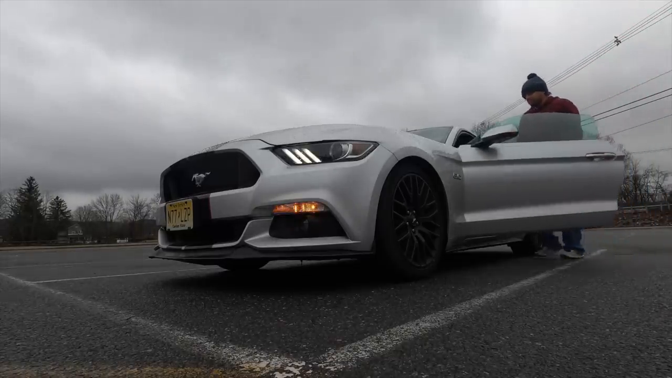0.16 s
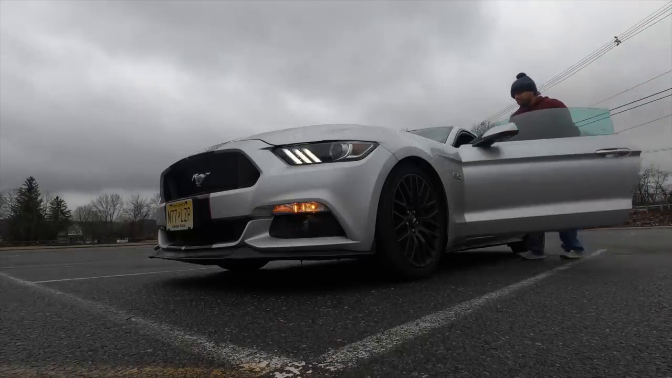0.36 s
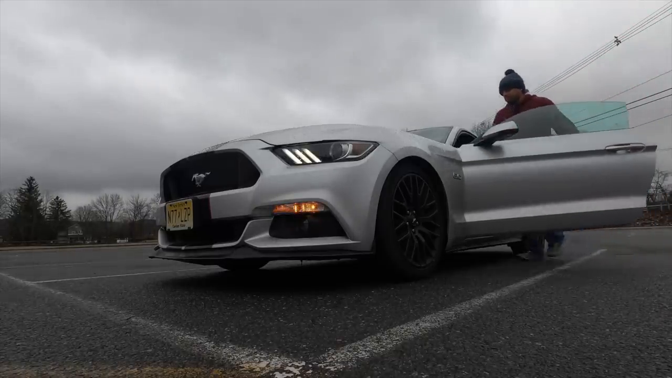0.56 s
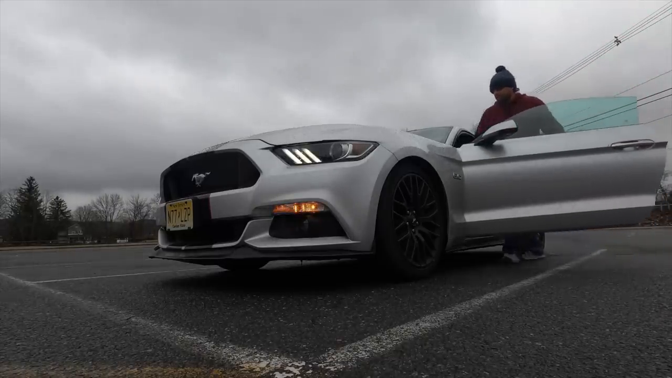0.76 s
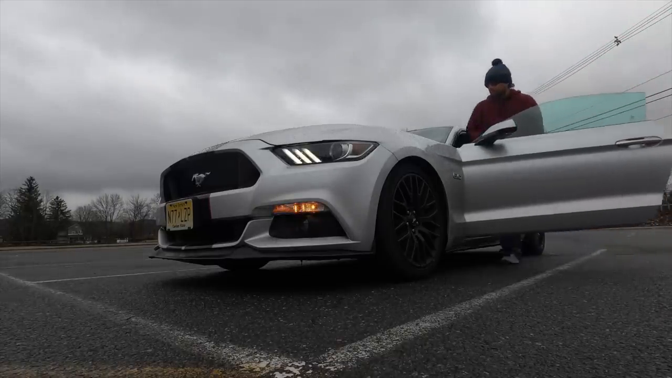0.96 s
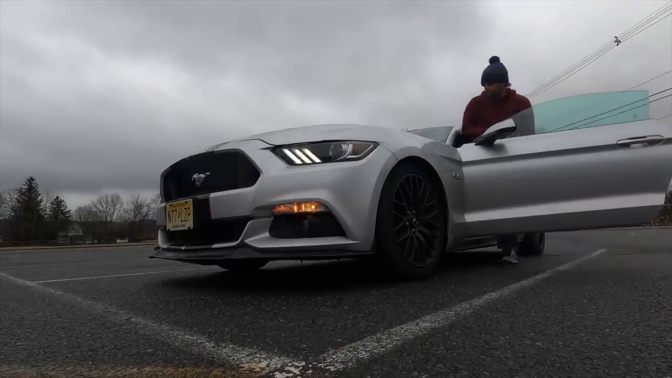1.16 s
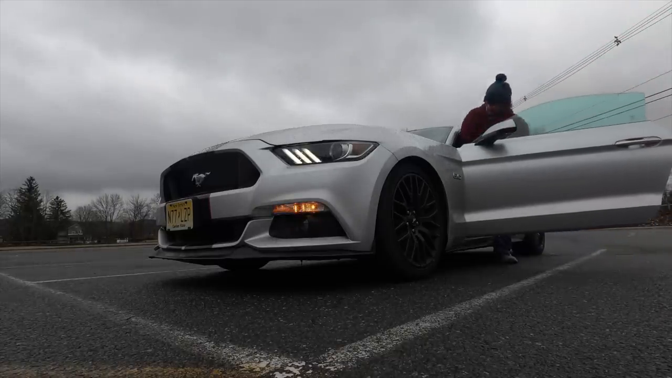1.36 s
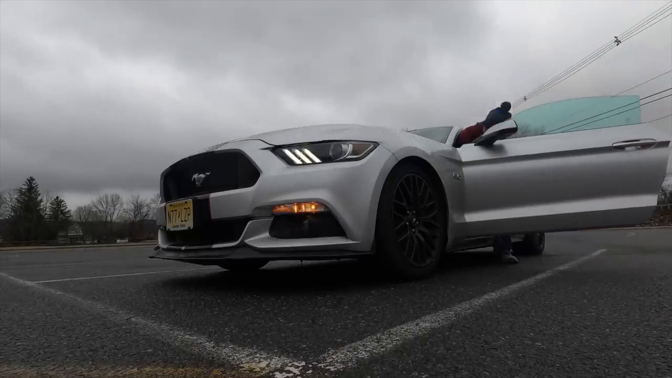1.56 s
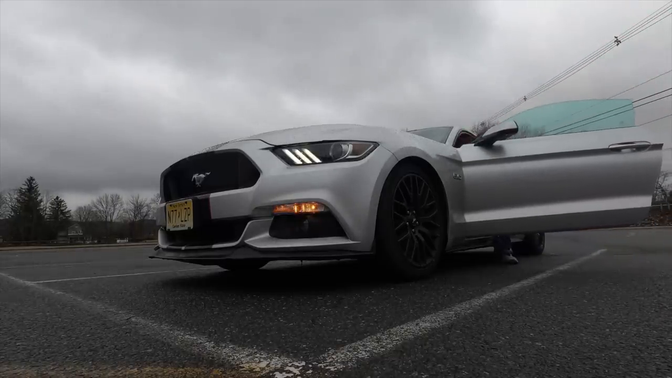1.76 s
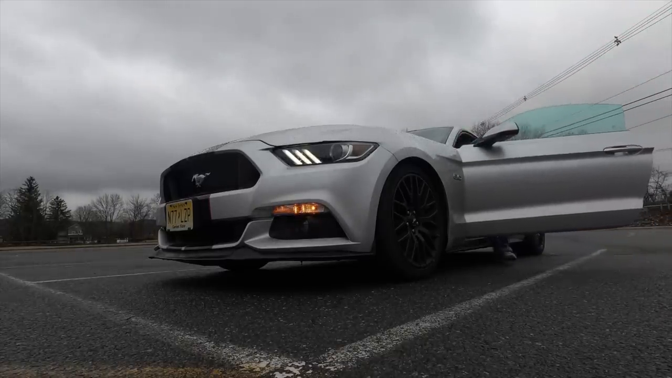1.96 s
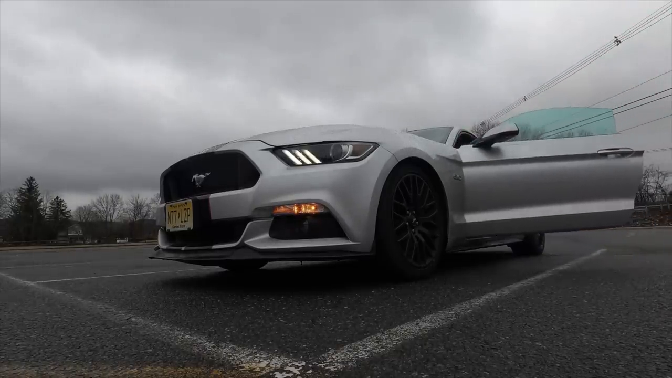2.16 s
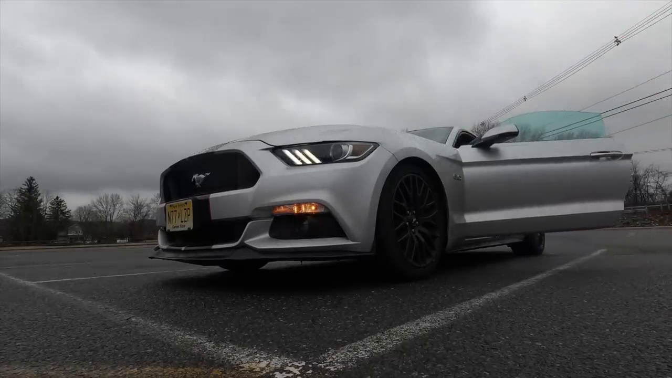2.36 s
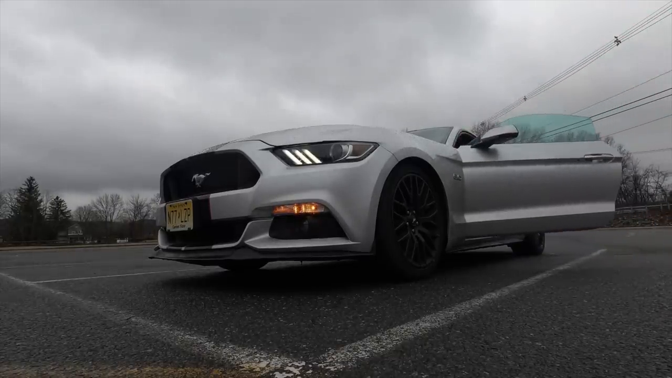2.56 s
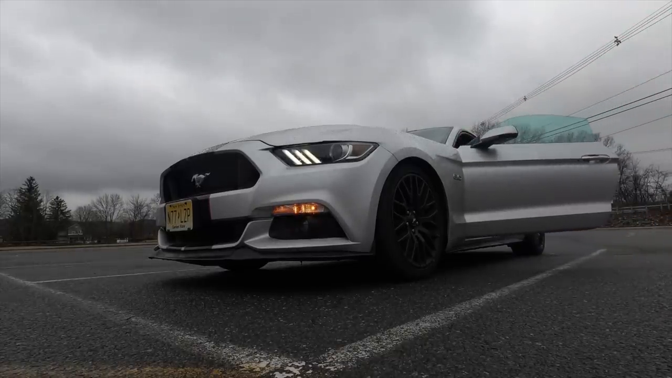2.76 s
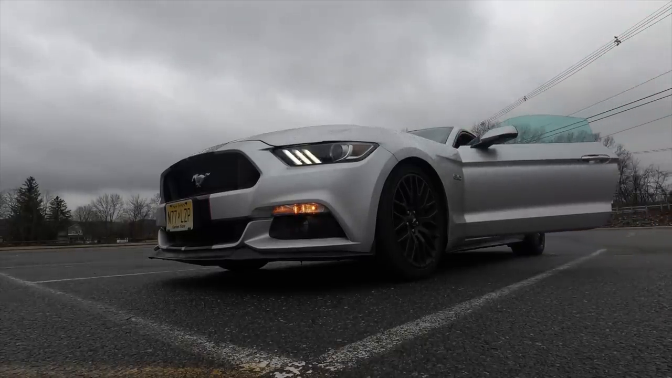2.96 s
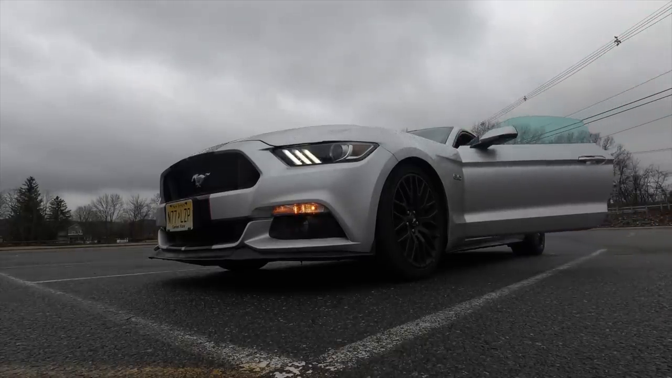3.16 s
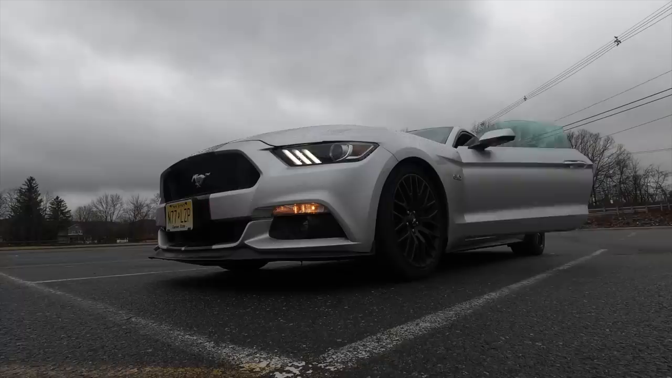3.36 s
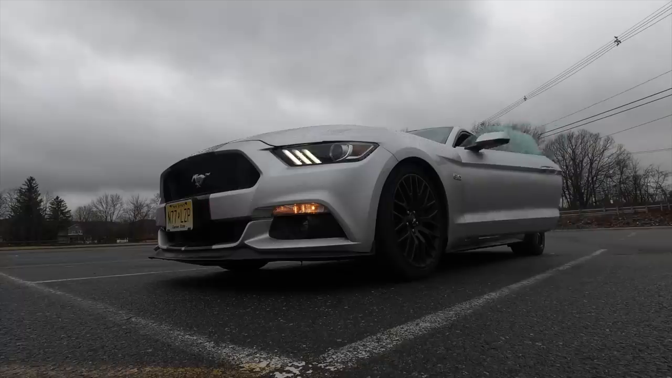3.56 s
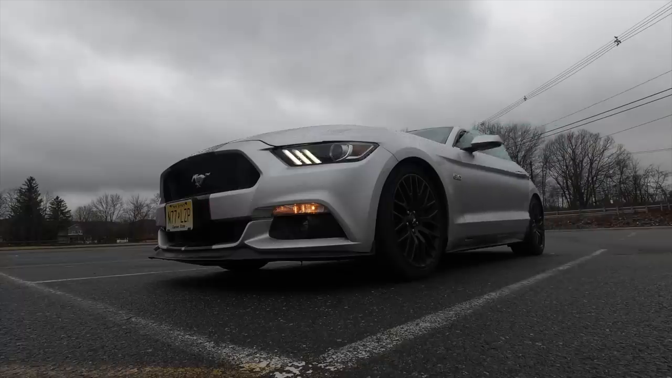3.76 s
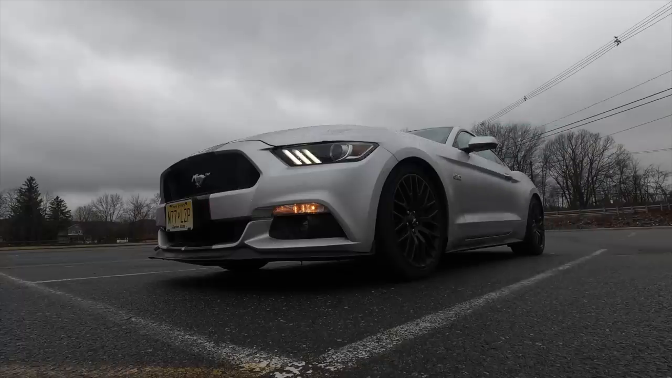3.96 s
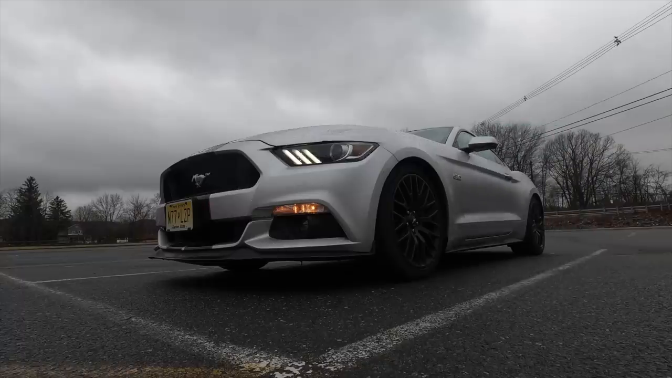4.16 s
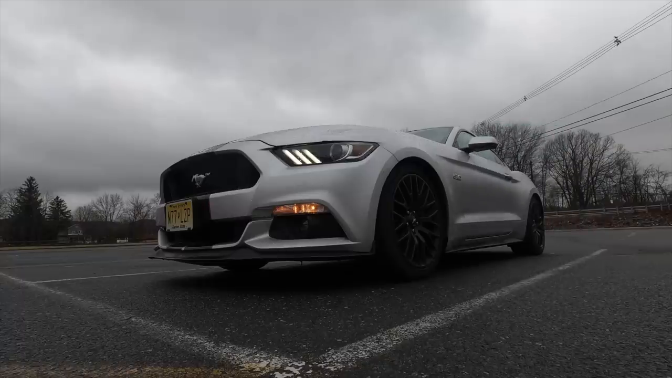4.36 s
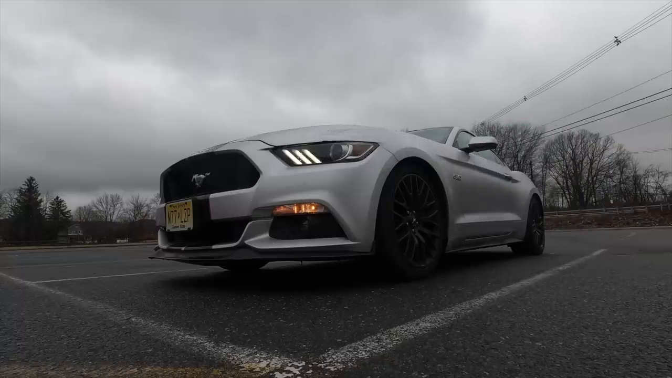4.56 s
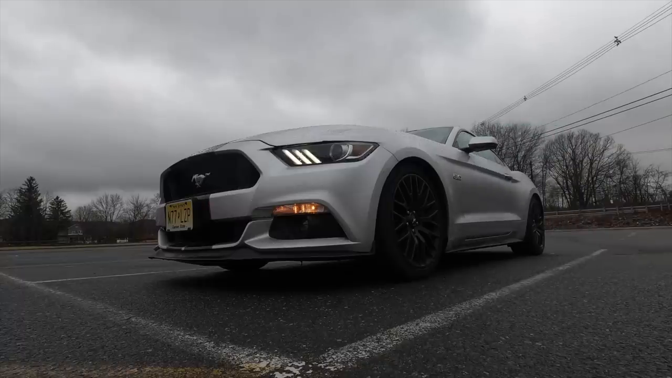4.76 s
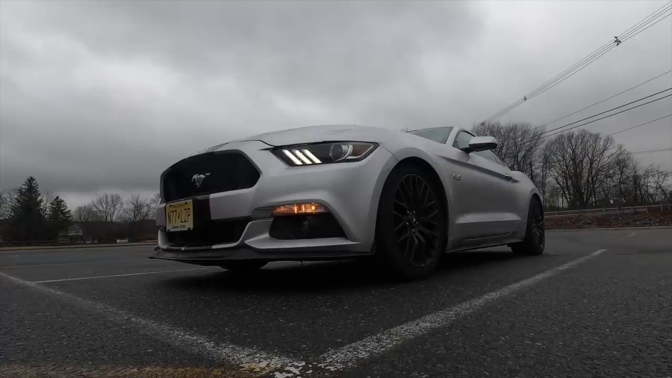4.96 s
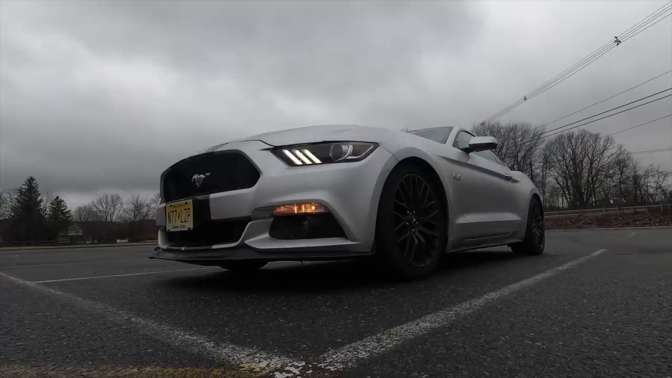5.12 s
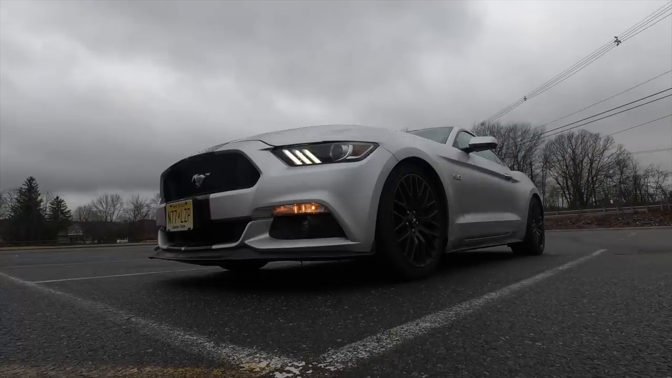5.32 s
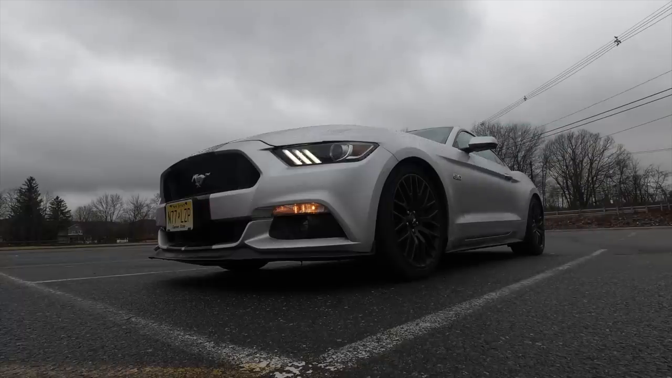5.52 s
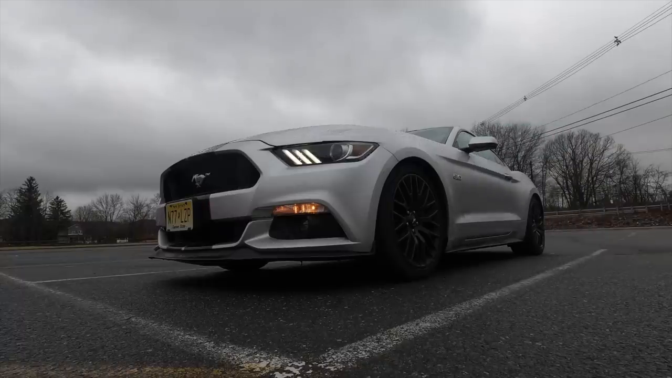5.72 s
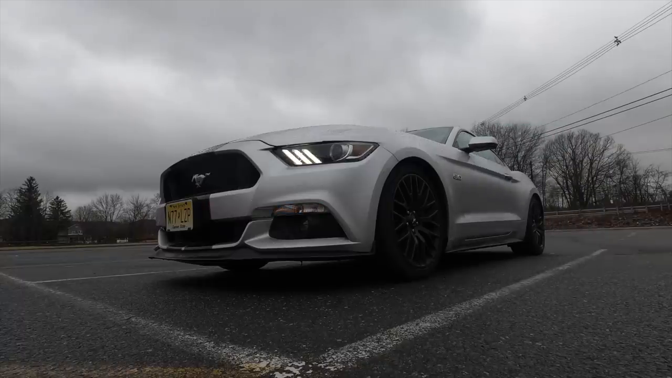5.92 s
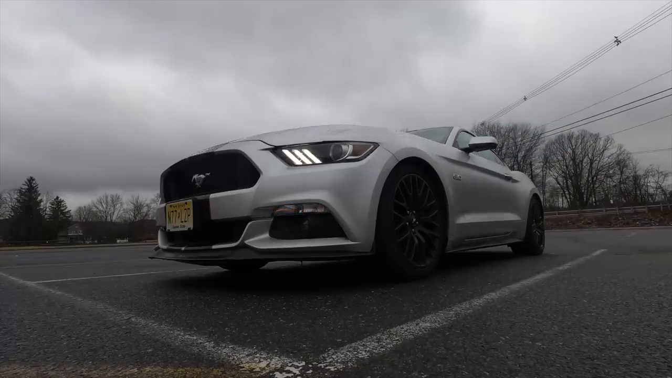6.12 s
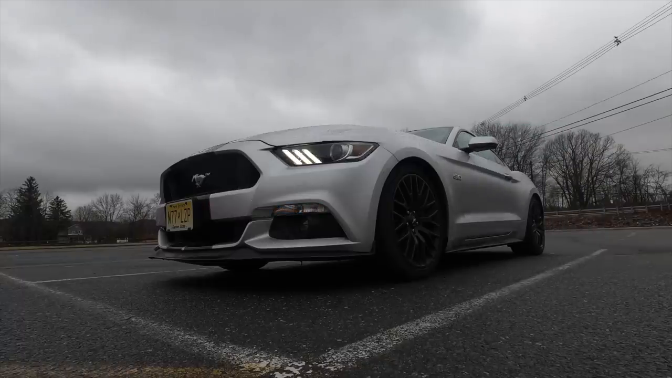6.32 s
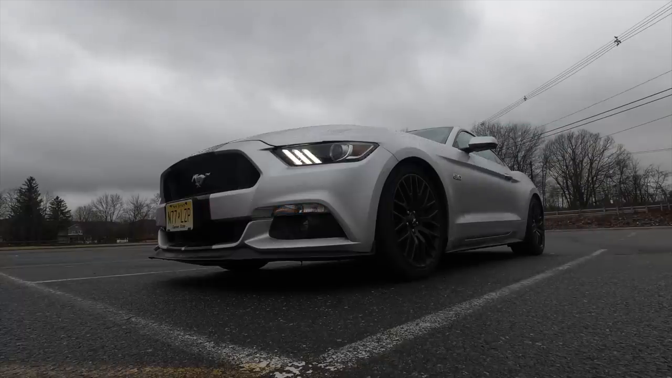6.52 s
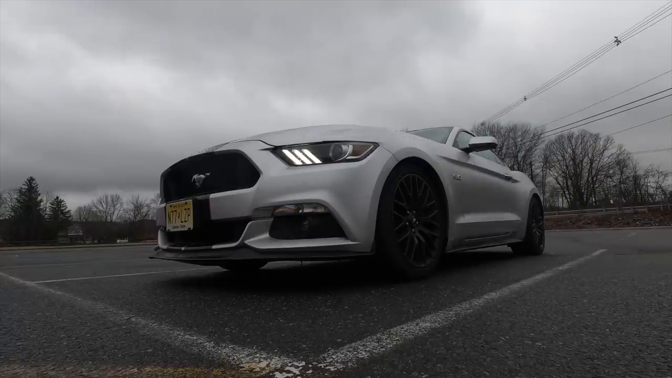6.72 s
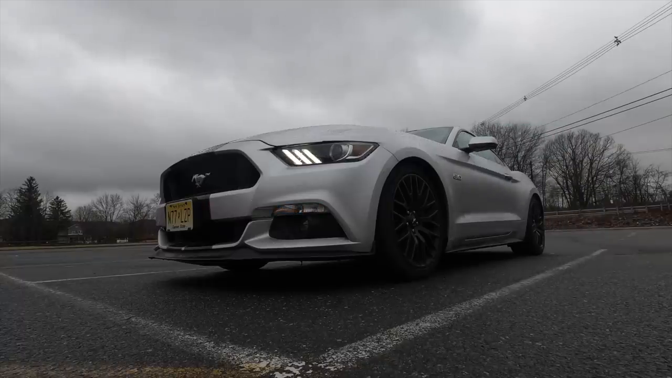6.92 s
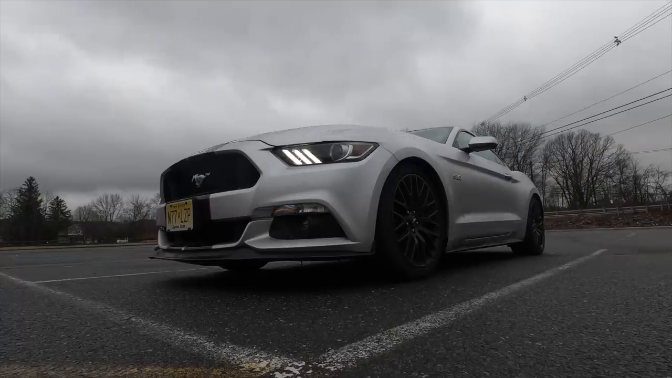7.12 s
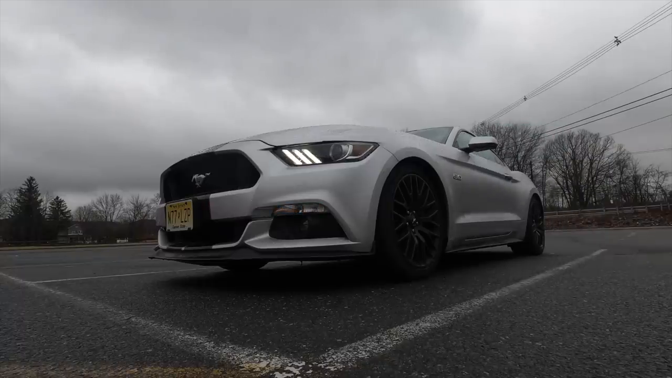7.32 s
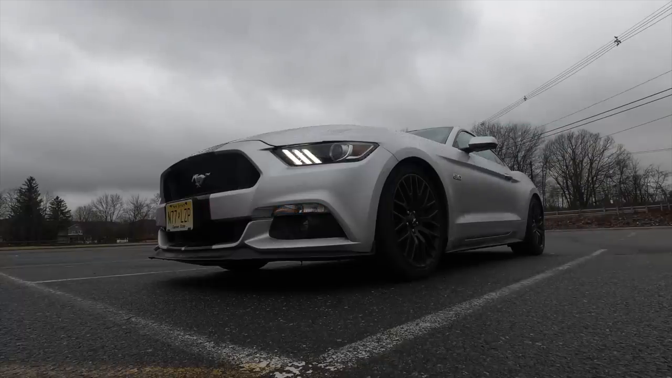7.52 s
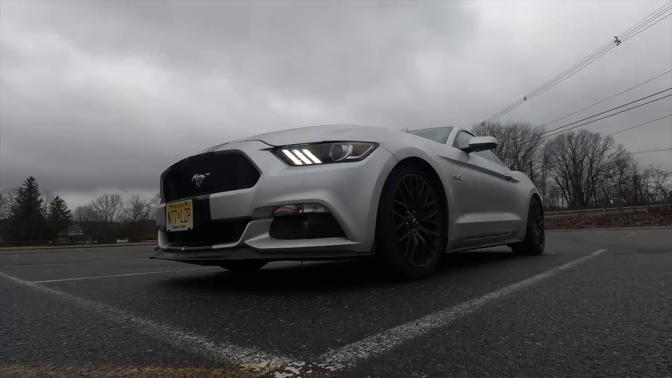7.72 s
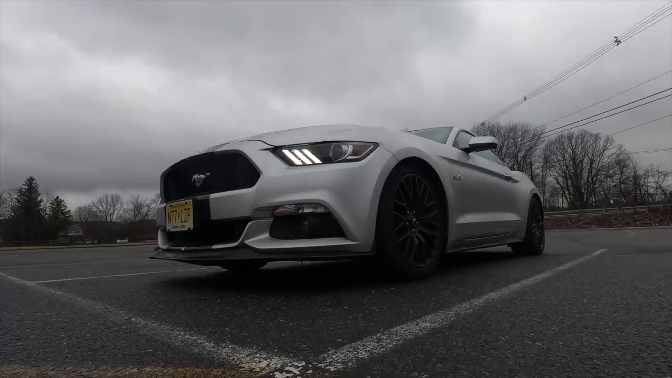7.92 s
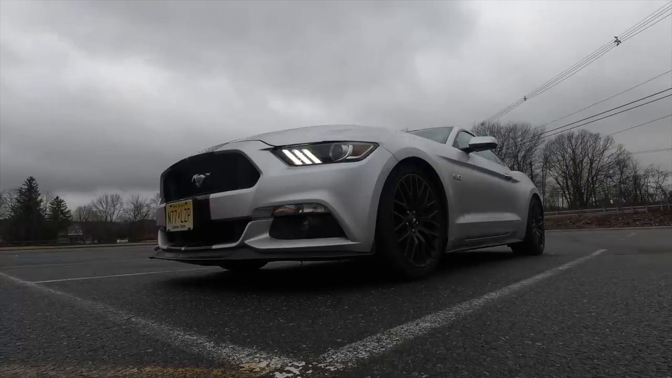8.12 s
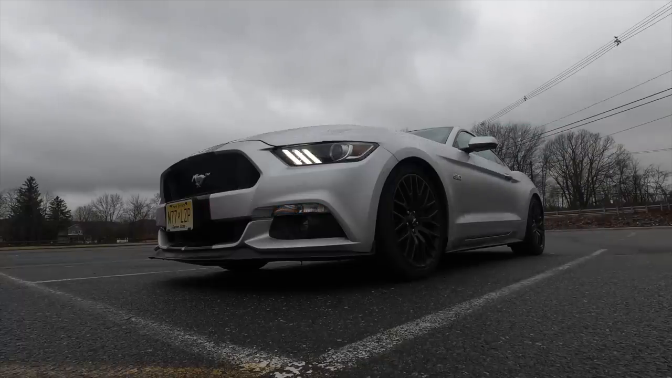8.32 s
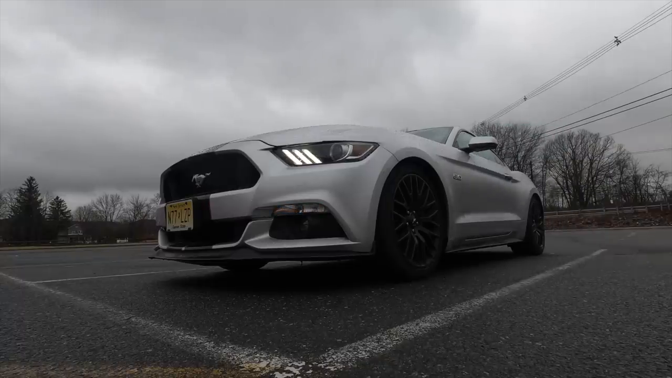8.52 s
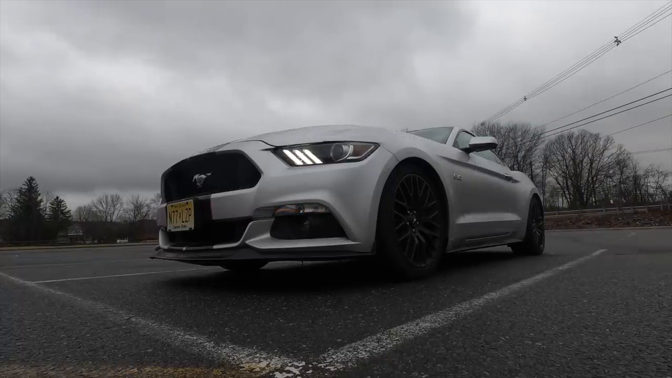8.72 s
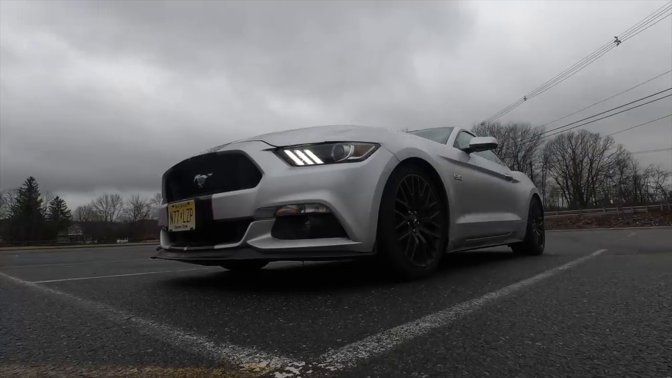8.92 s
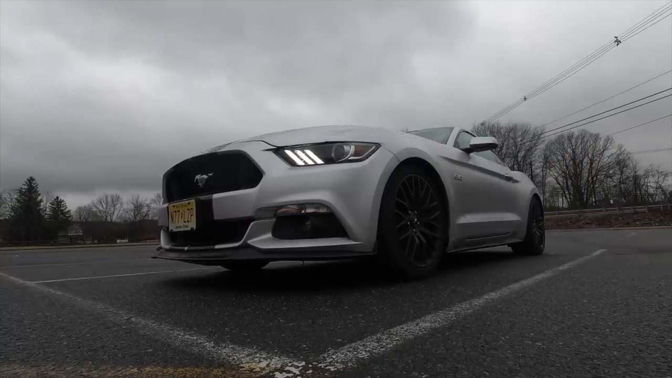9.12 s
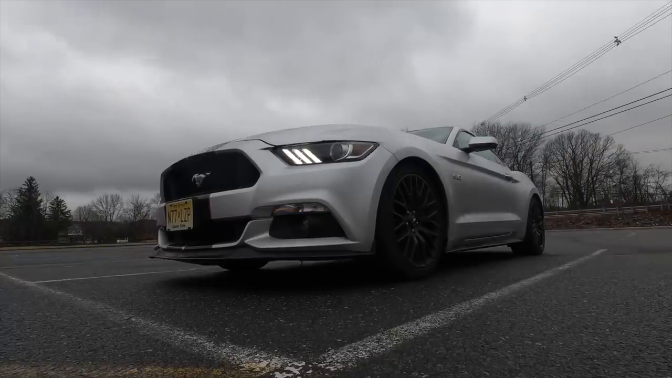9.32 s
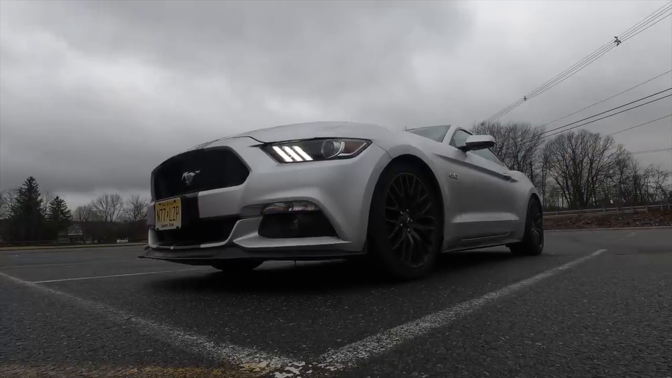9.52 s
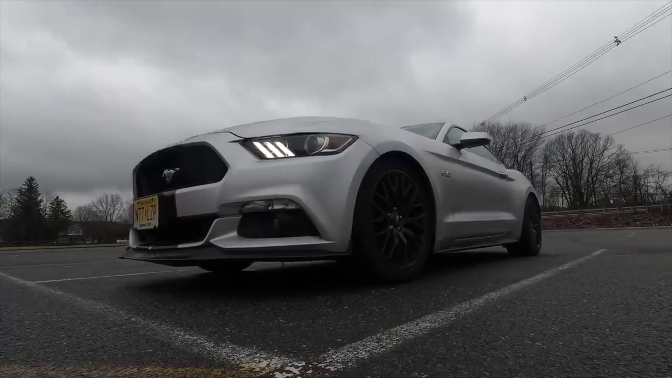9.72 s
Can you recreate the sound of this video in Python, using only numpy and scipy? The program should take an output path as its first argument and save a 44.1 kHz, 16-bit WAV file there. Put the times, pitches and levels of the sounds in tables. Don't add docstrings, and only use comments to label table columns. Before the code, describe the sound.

A quiet open car park, heard by a small stereo microphone on the ground near a large car. Distant tyre roar and low wavering lorry hums drone throughout, beneath a very faint thin electronic whine. From 0.4 to 2.1 s come sparse gritty shoe scuffs, light cloth rustles and a couple of knocks. At 4.0 s the door slams: latch clack, deep thud, ringing panel and tiny rebounds. Seat knocks and small clicks follow at 4.7, 5.0 and 5.5-5.8 s. At 5.97 s the starter clacks in, its bright metallic rattle surging through six quickening compressions over a low hum. From about 6.8 s heavy exhaust thumps take over; the eight-cylinder engine catches near 7.0 s, flares by 7.3 s, and eases around 8.1 s into a steadier boom. It revs again at 9.1-9.5 s, then drops in pitch, with throaty bark, clatter and belt fizz, until the end.

```python
import sys
import numpy as np
from scipy import signal
from scipy.fft import rfft, irfft, next_fast_len
from scipy.io import wavfile
from scipy.ndimage import uniform_filter1d, map_coordinates

SR = 44100
rng = np.random.default_rng(int(sys.argv[2]) if len(sys.argv) > 2 else 0)


def how_loud(loudness_db):
    steps = np.asarray(loudness_db, float) / 20
    return 10 ** steps


def store_wav(level_fs):
    pcm = np.round(np.clip(np.atleast_2d(level_fs), -1, 1) * 32767)
    wavfile.write(sys.argv[1], SR, pcm.T.astype(np.int16))


N = 435708

MESH_S, FREE_S, OUT_S = 5.99, 6.8, 7.1

# frequency in Hz, level in dB per Hz.
ROAR = [(110, -6), (200, -2), (400, -9), (1000, -9.5), (1700, -14), (2600, -22.5), (3800, -25),
        (5000, -37.5), (7000, -41), (9000, -56.5), (11000, -87), (15500, -100)]


def evened(x):
    return x / np.sqrt(np.mean(x ** 2) + 1e-20)


def read(points, hz, count=1):
    table = np.array(points, float)
    return np.interp(np.log(hz + 1), np.log(table[:, 0] + 1), table[:, count])


def play(rows):
    s, *columns = np.transpose(rows)
    t = np.arange(s[0], s[-1], 1 / SR)
    return [t] + [np.interp(t, s, column) for column in columns]


def add(mix, s, sound):
    part = mix[round(s * SR):][:len(sound)]
    part += sound[:len(part)]


def colour(x, spectrum):
    size = next_fast_len(len(x) + 4096)
    gain = how_loud(read(spectrum, np.fft.rfftfreq(size, 1 / SR)))
    return evened(irfft(rfft(x, size) * gain, size)[:len(x)])


def drift(size, per_s):
    knots = rng.standard_normal(int(size / SR * per_s) + 3)
    coarse = np.arange(0, size + 32, 32)
    smooth = map_coordinates(knots, [coarse / SR * per_s], order=3, mode="nearest")
    return evened(np.interp(np.arange(size), coarse, smooth))


def resonate(x, hz, width_hz):
    pole = np.exp((2j * np.pi * hz - np.pi * width_hz) / SR)
    ring = signal.lfilter([1], [1, -pole], signal.lfilter([1], [1, -pole], x))
    return evened((ring / (abs(ring) + 1e-9) ** 0.6).real)


def engine():
    # time in s, firings per s, throttle 0-1.
    speed = [(6.99, 84, .3), (7.086, 88.9, .15), (7.16, 92.5, .6), (7.26, 97.4, .95), (7.6, 96.7, 0.7),
             (7.74, 94.5, .8), (7.9, 91.5, 0.4), (8.1, 88.7, 0), (9.05, 89, 0.1), (9.2, 96, 0.6),
             (9.36, 99.5, 0.5), (9.44, 99.0, 0.5), (9.6, 92, .55), (9.748, 85.3, .05), (9.9, 78.5, .05)]
    t, hz, throttle = play(speed)
    cycle_s = 7.4065
    turns = np.cumsum(hz) / SR
    turns = turns - np.interp(cycle_s, t, turns)
    share = np.clip(throttle / 0.84, 0, 1)

    catch_db, catch_s = 2.5, .17
    rich_db = catch_db * np.exp(-((t - t[0]) / catch_s) ** 4)
    tuned_hz, detune_db_per_hz = 86.7, 0.25
    boom_db = -12.6 - 1.1 * throttle - detune_db_per_hz * abs(hz - tuned_hz) + rich_db
    bark_db = -33.5 + 6.5 * throttle + 2 * rich_db

    bark, pops = exhaust(t, turns, share)
    out = firing_orders(t, turns, boom_db, share) + how_loud(bark_db - 1.5) * bark + pops
    out += gated_noise(t, hz, turns, throttle)
    full = np.zeros(N)
    add(full, t[0], out * np.minimum((t - t[0]) / .015, 1))
    return full


def firing_orders(t, turns, boom_db, share):
    # multiple of the firing rate, level in dB.
    shut_orders = [(0.125, -51), (0.25, -37), (0.375, -41), (0.5, -37), (0.625, -37), (0.75, -26.5),
                   (0.875, -35), (1, 0), (1.12, -29), (1.25, -21), (1.38, -17), (1.5, -38), (1.62, -36.5),
                   (1.75, -27), (1.88, -32), (2, -23.5), (2.12, -40.5), (2.25, -31), (2.38, -35.5),
                   (2.5, -44.5), (2.62, -41.5), (2.75, -44.5), (2.88, -34), (3, -32)]
    # multiple of the firing rate, level in dB.
    open_orders = [(0.125, -45), (0.25, -36), (0.375, -44), (0.5, -22), (0.625, -32), (0.75, -21),
                   (0.875, -13), (1, 0), (1.12, -22), (1.25, -7), (1.38, -17), (1.5, -27), (1.62, -21),
                   (1.75, -17), (1.88, -20), (2, -16), (2.12, -28), (2.25, -20), (2.38, -43), (2.5, -47),
                   (2.62, -47), (2.75, -37), (2.88, -31), (3, -29)]
    out = np.sqrt(2) * how_loud(boom_db + 0.14 * drift(len(t), 13.0)) * np.cos(2 * np.pi * turns)
    for k, ((_, shut_db), (_, open_db)) in enumerate(zip(shut_orders, open_orders), 1):
        if k == 8:
            continue
        level_db = boom_db + shut_db + share * (open_db - shut_db) + 1.2 * drift(len(t), 7.0)
        if k < 13:
            start = .25 if k % 2 else .5
        else:
            start = rng.random()
        wave = np.cos(2 * np.pi * (k / 8 * turns + start) + 0.2 * drift(len(t), 8.0))
        out += np.sqrt(2) * how_loud(level_db) * wave
    return out


def exhaust(t, turns, share):
    # dB throttle shut, dB throttle open, bank.
    cylinders = [(0, 0, 0), (-9, -9, 0), (0, -7, 1), (-3, -4, 0), (0, -2, 0), (-6, -8, 1), (-4, -7, 1),
                 (-4, -4, 1)]
    # frequency in Hz, width in Hz, level in dB.
    pipe_modes = [(295, 50, -7), (390, 50, -16), (464, 50, 0), (555, 45, -12), (680, 25, -14),
                  (860, 50, -14), (990, 70, -7), (1080, 50, -13), (1250, 40, -14)]
    bank_lag_s = .00108
    crack_db, crack_hz, crack_width_hz = -21.5, 1050, 800
    at = np.flatnonzero(np.diff(np.floor(turns)))
    cylinder = np.floor(turns[at + 1]).astype(int) % 8
    luck = rng.standard_normal((len(at), 3))
    shut_db, open_db, bank = np.transpose(cylinders)[:, cylinder]
    lag = np.round(SR * (bank * bank_lag_s + .00005 * luck[:, 0])).astype(int)
    place = np.clip(at + lag, 0, len(t) - 1)

    blows, pops = np.zeros(len(t)), np.zeros(len(t))
    blows[place] = how_loud(shut_db + share[at] * (open_db - shut_db) + 1.5 * luck[:, 1])
    pops[place] = (cylinder == 0) * share[at] ** 2 * how_loud(crack_db + 1.5 * luck[:, 2])

    u = np.arange(3000) / SR

    def ring(hz, width_hz):
        return np.sin(2 * np.pi * hz * u) * np.exp(-np.pi * width_hz * u)

    pipe = sum(how_loud(db) * ring(hz, width_hz) for hz, width_hz, db in pipe_modes) * np.minimum(u / .0015, 1)
    bark = evened(signal.oaconvolve(blows, pipe)[:len(t)])
    return bark, signal.oaconvolve(pops, 2 * ring(crack_hz, crack_width_hz))[:len(t)]


def gated_noise(t, hz, turns, throttle):
    puff_db = [0, -13, -22, -15, -4, -22, -11, -20]
    # frequency in Hz, level in dB per Hz.
    clatter = [(100, -40), (250, -17), (500, -16), (1000, -13), (1700, -20.5), (2600, -16.5), (3800, -17.5),
               (5000, -47.5), (7000, -55), (9000, -100)]
    # frequency in Hz, level in dB per Hz.
    fizz = [(2500, -66), (3800, -4.5), (5000, 1), (7000, -3), (8500, -6.5), (10000, -11.5), (13000, -13.5),
            (15500, -54.5)]
    firing = np.floor(turns - np.floor(turns[0])).astype(int)
    luck_db = 1.5 * rng.standard_normal(firing[-1] + 1)[firing]
    blow = how_loud(np.array(puff_db)[np.floor(turns).astype(int) % 8] + luck_db)
    puffs = rng.standard_normal(len(t)) * (2.2 + blow * np.exp(-(turns % 1) / 0.27))

    slip_db, slip_hz_per_s = 4.5, 18
    slip = uniform_filter1d(np.minimum(abs(np.gradient(hz)) * SR / slip_hz_per_s, 1), size=3000)
    clatter_db = -46 + 3.5 * throttle + 3.0
    fizz_db = -63 + 2.5 * throttle + slip_db * slip + 9.0
    body_db = -44.5 + 2.5 * throttle
    out = how_loud(clatter_db) * colour(puffs, clatter)
    return out + how_loud(fizz_db) * colour(puffs, fizz) + how_loud(body_db) * colour(puffs, ROAR)


def starter():
    # frequency in Hz, width in Hz, level in dB.
    tooth_modes = [(3245, 190, -1), (3656, 560, -3), (5790, 46, -12), (6870, 88, -30), (8470, 110, -26),
                   (11000, 180, -28.5)]
    # frequency in Hz, level in dB per Hz.
    grind = [(200, -40), (500, -14), (900, 4), (1300, 10), (2000, 7.5), (2700, -5), (4000, -55),
             (7000, -85)]
    # frequency in Hz, level in dB per Hz.
    scrape = [(2000, -15), (2800, 3), (3900, -1), (5000, -3), (7000, -9.5), (10000, -21.5), (13000, -23.5),
              (15500, -54)]
    free_db = -8.5
    t = np.arange(MESH_S, OUT_S, 1 / SR)
    load_db, treble_db, phase = strokes(t)
    rattle = rng.standard_normal(len(t)) * how_loud(0.8 * drift(len(t), 300.0))
    steady, sung = housing(t, rattle)
    teeth = sum(resonate(rattle, hz, width_hz) * how_loud(db + 2.3 * drift(len(t), 13.6))
                for hz, width_hz, db in tooth_modes)

    low = how_loud(-14.0 + free_db * np.clip((t - FREE_S) / .1, 0, 1)) * steady
    low = low + how_loud(-3.5) * colour(rattle, grind)
    high = how_loud(-7.5 + free_db * np.clip((t - FREE_S) / .05, 0, 1)) * evened(teeth)
    scrape_db = .5 * (treble_db.mean() - treble_db) - 6.0
    high = high + how_loud(scrape_db) * colour(rattle, scrape)

    gear = how_loud(-4.0 + 1.5 * drift(len(t), 60.0)) * sung + low * how_loud(load_db) + high * how_loud(treble_db)
    out = np.zeros(N)
    add(out, t[0], gear * signal.windows.tukey(len(t), .04))
    add(out, t[0], armature(t, load_db, phase))
    return out


def strokes(t):
    # start in s, gear load in dB, treble in dB, share spent rising.
    compressions = [
        (6.0, -24, -26, .55),
        (6.19, -20.5, -23.5, 0.5),
        (6.334, -20, -22, 0.32),
        (6.475, -18.5, -22, 0.2),
        (6.592, -21, -21, .08),
        (6.688, -19.5, -20, 0.14),
    ]
    slack_db, first_slack_db, treble_lead = -14, -4, 0.66
    overrun_load_db, overrun_treble_db, kick_s = -31.5, -25, 6.945
    starts, load_db, treble_db, rise = np.transpose(compressions)
    k = np.clip(np.searchsorted(starts, t) - 1, 0, None)
    phase = np.clip((t - starts[k]) / (np.append(starts[1:], FREE_S) - starts)[k], 0, 1)
    before_db = np.where(k == 1, first_slack_db, slack_db)
    after_db = np.where(k == 0, first_slack_db, slack_db)

    def slack(peak):
        climb_db = before_db * abs(1 - phase / peak) ** 1.8
        sink_db = after_db * abs((phase - peak) / (1 - peak)) ** 1.38
        return np.where(phase < peak, climb_db, sink_db)

    overrun_db = np.interp(t, [FREE_S, kick_s, kick_s + .03, OUT_S], [0, 8, -5.0, -17.0])
    load = np.where(t < FREE_S, load_db[k] + slack(rise[k]), overrun_load_db + overrun_db)
    treble = np.where(t < FREE_S, treble_db[k] + slack(treble_lead * rise[k]), overrun_treble_db + overrun_db)
    return load, treble, phase


def housing(t, rattle):
    # frequency in Hz, width in Hz, level under the steady rattle in dB.
    mode_rows = [(950, 14, 0), (1065, 30, -4), (1160, 20, -6), (1265, 24, -5), (1345, 24, -4),
                 (1555, 22, -6), (1740, 60, -6), (2354, 24, -9)]
    # time of strongest drive in s, mode in Hz, level in dB, build-up in s.
    passes = [(6.01, 1265, -30, .01), (6.07, 1265, -31, .04), (6.08, 1345, -29, .02),
              (6.09, 1065, -31, .03), (6.12, 950, -32, .04), (6.14, 1065, -30, .015),
              (6.15, 1160, -33, .03), (6.25, 950, -19.5, .035), (6.265, 1065, -28, .015),
              (6.265, 1345, -26, .04), (6.26, 1555, -30, .04), (6.26, 1265, -30, .04),
              (6.36, 1065, -27, .015), (6.385, 1740, -29, .03), (6.39, 1555, -31, .03),
              (6.405, 950, -17, .008), (6.505, 1160, -26, .012), (6.5, 1065, -30, .015),
              (6.52, 1345, -27, .02), (6.545, 950, -24, .025), (6.615, 1065, -22, .015),
              (6.61, 1160, -28, .01), (6.64, 950, -33, .02), (6.705, 1160, -26, .012),
              (6.71, 950, -28, .015), (6.73, 1065, -21, .025), (6.72, 1555, -27, .02),
              (6.72, 1345, -29, .02), (6.72, 2354, -33, .02), (6.79, 1160, -33, .03)]
    modes = {hz: resonate(rattle, hz, width_hz) for hz, width_hz, _ in mode_rows}
    steady = evened(sum(modes[hz] * how_loud(db) for hz, _, db in mode_rows))
    sung = np.zeros(len(t))
    for s, hz, db, build_s in passes:
        fade_db_per_s = 170 * (hz / 950) ** 1.5
        drop_db = np.where(t < s, 12.0 * ((s - t) / build_s) ** 2, fade_db_per_s * (t - s))
        sung += modes[hz] * how_loud(db - drop_db)
    return steady, sung


def armature(t, load_db, phase):
    start_hz, top_hz, spin_up_s = 250, 370, .25
    sag, sag_eases_s = .3, .45
    spin_hz = top_hz - (top_hz - start_hz) * np.exp(-(t - 6.0) / spin_up_s)
    hz = spin_hz * (1 - sag * np.exp(-(t - MESH_S) / sag_eases_s) * uniform_filter1d(phase, 600))
    hz = hz * (1 + 0.047 * drift(len(t), 40.0))
    hum_db = -28.5 + 1.3 * (load_db - load_db.max()) - 20 * (t > FREE_S)
    return np.sin(2 * np.pi * np.cumsum(hz) / SR) * how_loud(hum_db + 3.0 * drift(len(t), 28.26))


def knocks():
    # time in s, peak in dB, ring in Hz, t60 in s.
    thuds = [(2.031, -22.5, 370, 0.051), (2.159, -23, 987, 0.06), (4.007, -17.5, 150, 0.17),
             (4.014, -8, 50, 0.3), (4.043, -7, 85, 0.13), (4.017, -15, 690, .06), (4.046, -19, 700, .08),
             (4.07, -14, 58, .2), (4.732, -27, 210, .09), (5.685, -31, 460, .12), (4.052, -14.5, 218, 0.1),
             (4.02, -18, 318, 0.064), (4.088, -11, 66, 0.22), (5.029, -17, 173, 0.088),
             (6.231, -20.5, 79, 0.38), (6.794, -18.5, 69.5, 0.31), (6.826, -9, 92, 0.35),
             (6.862, -7.5, 92, 0.21), (6.89, -8, 100, 0.15), (6.918, -6.5, 111.7, 0.13),
             (6.934, -9.5, 92.8, 0.15), (6.958, -4, 75.5, 0.17), (6.984, -22.5, 78.4, 0.15)]
    out = np.zeros(N)
    t, f = np.arange(SR // 4) / SR, np.fft.rfftfreq(SR // 4, 1 / SR)
    for s, db, hz, t60_s, octaves in bursts():
        bell = np.exp(-.5 * (np.log2((f + 50) / hz) / octaves) ** 2)
        edge = 0.11 * np.minimum(f / hz, hz / (f + 1)) ** 3
        grit = evened(irfft(rfft(rng.standard_normal(len(t))) * (bell + edge), len(t)))
        attack = np.minimum(t / (0.043 * t60_s), 1)
        add(out, s, grit * how_loud(db - 6.5 - 60 * t / t60_s) * attack * (1 - t / t[-1]))
    t = np.arange(SR // 2) / SR
    for s, db, hz, t60_s in thuds:
        ring = np.sin(2 * np.pi * hz * t) * how_loud(db - 60 * t / t60_s)
        add(out, s, ring * np.minimum(t / 0.0033, 1) * (1 - t / t[-1]))
    return out


def bursts():
    # time in s, peak in dB, centre in Hz, t60 in s.
    scuffs = [(0.4668, -22, 3650, 0.02), (0.5317, -33, 3200, 0.06), (0.707, -34, 3300, 0.04),
              (0.9727, -26, 3500, 0.025), (1.2965, -31.5, 3100, 0.22), (1.3191, -23.5, 2906, 0.18),
              (1.3368, -21, 3400, 0.04), (2.0258, -37, 2930, 0.28), (2.0481, -19.5, 2220, 0.046),
              (4.073, -17, 2500, 0.03), (4.7334, -25, 3300, 0.091), (5.001, -34.5, 3460, 0.11),
              (5.5427, -32, 2650, 0.16), (5.6798, -21, 2800, 0.15), (5.7484, -30.5, 3140, 0.04),
              (5.7725, -21, 3330, 0.07)]
    # time in s, peak in dB, centre in Hz.
    rustles = [(0.4213, -47, 5950), (0.443, -36.5, 6420), (0.903, -47, 5950), (0.957, -52, 5800),
               (1.2784, -48, 6430), (1.8697, -50.5, 8000), (1.9, -51, 8310), (1.919, -47.5, 6500),
               (1.948, -53, 7500), (2.035, -46, 6500), (2.048, -44.5, 7950), (4.734, -46, 6860),
               (5.0404, -52, 5800), (5.4564, -46, 5670)]
    # time in s, peak in dB.
    slam = [
        (4.003, -7),
        (4.016, -4.5),
        (4.045, -10),
        (4.073, -21),
        (4.095, -23.5),
        (4.12, -30),
    ]
    # time in s, peak in dB, centre in Hz, t60 in s, spread in octaves.
    clacks = [(4.732, -24, 880, 0.1, 1), (5.964, -15, 2190, 0.2, 0.8), (5.974, -10, 3000, 0.1, 0.4),
              (5.968, -21, 6500, .2, .4), (6.0, -22, 1300, .15, .5), (6.839, -22, 407, 1, 0.62),
              (6.83, -12, 88, .7, .35), (2.155, -24, 950, .08, .7), (4.045, -12, 1300, .03, .9),
              (5.543, -46, 9000, .12, .5), (5.68, -38, 9000, .1, .6), (5.7725, -36, 9500, .1, .6),
              (5.745, -50, 8000, .15, .5), (1.33, -30, 2000, .1, .35), (.443, -42, 8500, .04, .4),
              (6.0806, -22, 3300, .05, .5), (6.363, -17, 2600, .04, .7), (6.4867, -18, 2300, .04, .7),
              (6.5974, -17, 2600, .04, .8), (6.6932, -15, 2600, .05, .8), (6.92, -18, 456, 0.7, 0.93),
              (6.81, -28.5, 7500, 1, 0.41), (6.933, -18, 1480, .12, 1.7), (6.935, -20.5, 5870, 0.19, 0.3)]
    # extra level in dB, centre in Hz, t60 in s, spread in octaves.
    door_parts = [(0.092, 600, 0.053, 1.18), (-8, 3000, .05, .55), (-23, 6200, .04, .35)]
    out = list(clacks)
    for s, db, hz, t60_s in scuffs:
        out.append((s, db, hz, t60_s, min(.25 + 2.65 * t60_s, .7)))
    for s, db, hz in rustles:
        out.append((s, db, hz, 0.07, .45))
    for s, db in slam:
        longer = 1 + 19 * (s - slam[0][0])
        for extra_db, hz, t60_s, octaves in door_parts:
            out.append((s, db + extra_db, hz, t60_s * longer, octaves))
    return out


def traffic():
    # time in s, swell in dB.
    swell = [(0.0, -1), (0.8, 1), (1.6, 0.2), (2.15, 2), (3.0, -1), (3.6, -0.6), (5.9, 2), (9.9, 7.5)]
    # frequency in Hz, level in dB per Hz.
    rumble = [(12, -26.5), (28, -0.5), (45, 0.5), (70, -1), (110, -4.5), (160, -9), (230, -39), (500, -110)]
    # start in s, length in s, first pitch in Hz, last pitch in Hz, level in dB.
    hums = [(0.054, .55, 140, 133, -33), (.55, .97, 134, 140, -32), (1.7, .35, 150, 122, -38.5),
            (0.056, 1.31, 181, 181, -39.5), (1.42, .85, 212, 245, -42), (2.1, 0.702, 126, 119, -36.5),
            (2.55, 2.1, 72, 61, -34.5), (4.0, 2, 62, 59, -32), (6.1, .6, 70, 58, -35),
            (4.22, .2, 297, 295, -45), (4.55, .7, 291, 286, -50), (5.35, .4, 285, 281, -45)]
    _, swell_db = play(swell)
    out = colour(rng.standard_normal(N), ROAR) * how_loud(-37.5 + swell_db[:N] + 0.69 * drift(N, 4.9))
    out += colour(rng.standard_normal(N), rumble) * how_loud(-33 + 1.1 * drift(N, 2.95))
    for s, length_s, first_hz, last_hz, db in hums:
        size = round(length_s * SR)
        hz = np.linspace(first_hz, last_hz, size) + 1.13 * drift(size, 6.02)
        hum = np.sin(2 * np.pi * np.cumsum(hz) / SR) * how_loud(db + 2.0 + 2.5 * drift(size, 7.0))
        add(out, s, hum * signal.windows.tukey(size, .15))
    return out


def duck(x):
    sense_s, knee_db, duck_share, recover_db_per_s = 0.37, -25.5, 0.96, 3.5
    keep = np.exp(-1 / (sense_s * SR))
    fall_db = np.arange(N) * recover_db_per_s / SR
    power_db = 10 * np.log10(signal.lfilter([1 - keep], [1, -keep], x ** 2) + 1e-12)
    held_db = np.maximum.accumulate(power_db + fall_db) - fall_db
    return how_loud(-duck_share * np.maximum(held_db - knee_db, 0))


def ports(x, likeness, extra_db):
    # frequency in Hz, level in dB, phase in rad,
    # likeness 0-1 for the car, likeness 0-1 for far traffic.
    left_port = [(1, .6, 0, .97, .97), (80, .7, -.045, .999, .995), (170, .5, -.09, .999, .99),
                 (350, 0, -.15, .995, .99), (700, -1.8, -.3, .98, .94), (1550, -1.6, -.5, .96, .9),
                 (2600, 2.1, -.75, .95, .88), (3600, 5, -1.4, .95, .9), (4150, 5.7, -2, .92, .8),
                 (4800, -.3, -3.1, .94, .65), (5700, -7.7, -3.3, .62, .58), (6500, -11, -2.4, .45, .45),
                 (9000, -18, -1.5, .45, .25), (12000, -11.5, -1, .3, .2)]
    _, _, z = signal.stft(x, SR, nperseg=512)
    z = z * np.exp(2j * np.pi * rng.random(z.shape))
    scatter = signal.istft(z, SR, nperseg=512)[1][:N] * 1.6
    size = next_fast_len(N + 4096)
    hz = np.fft.rfftfreq(size, 1 / SR)
    same = np.clip(read(left_port, hz, count=likeness), 0, 1)
    turn = how_loud(read(left_port, hz) + extra_db(hz)) * np.exp(1j * read(left_port, hz, count=2))
    left = turn * (same * rfft(x, size) + np.sqrt(1 - same ** 2) * rfft(scatter, size))
    return np.array([irfft(left, size)[:N], x])


def scene():
    # frequency in Hz, extra level in dB.
    far_left = [(170, 0), (700, 2), (2600, 1), (4500, 1), (5700, 10), (6500, 11), (9000, 10), (11000, 5)]
    car = knocks() + starter() + engine()
    near = ports(car, likeness=3, extra_db=lambda hz: 0 * hz)
    return near + ports(traffic() * duck(car), likeness=4, extra_db=lambda hz: read(far_left, hz))


def low_pass(x):
    return signal.sosfilt(signal.butter(12, 15550, fs=SR, output="sos"), x)


def record(dry):
    # time in s, level in dB.
    whine_level = [
        (0, -62),
        (5.95, -62),
        (6.1, -80),
        (9.9, -80),
    ]
    t, whine_db = play(whine_level)
    whine = (how_loud(whine_db) * np.sin(2 * np.pi * 5179 * t))[:N]
    soft = .9 * np.tanh(dry / .9)
    return low_pass(soft + whine * how_loud([[0], [-25]]))


dry = scene()
out = record(dry)
store_wav(out)
```